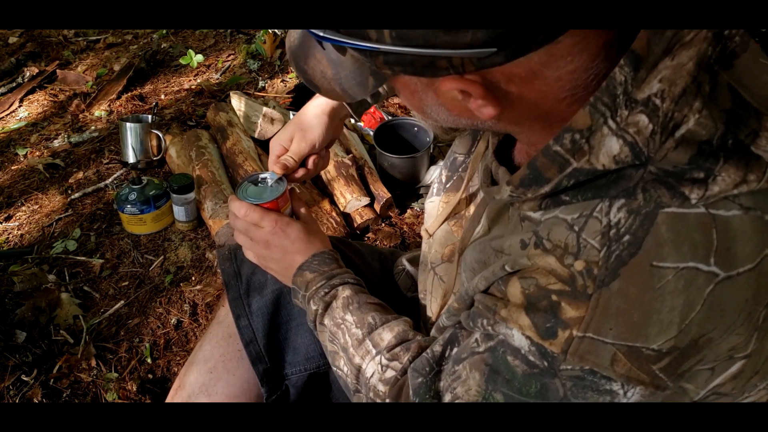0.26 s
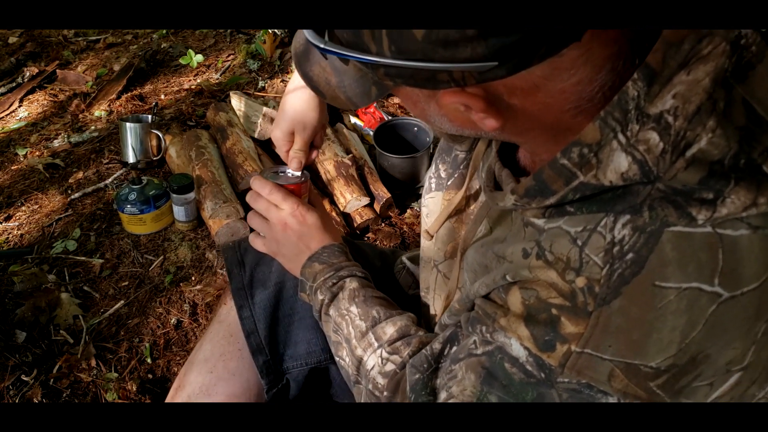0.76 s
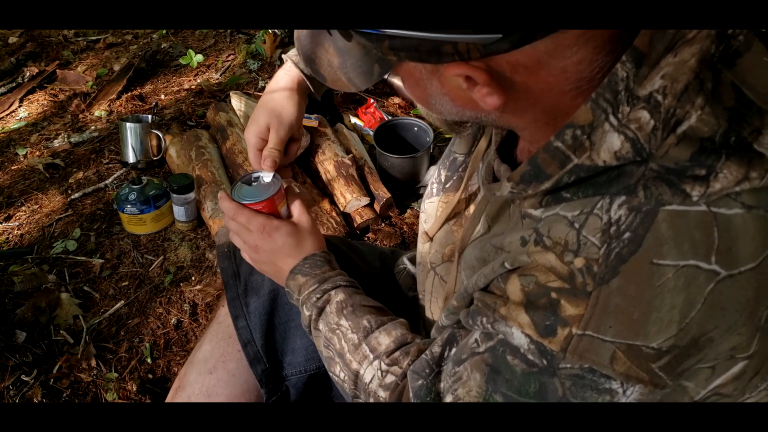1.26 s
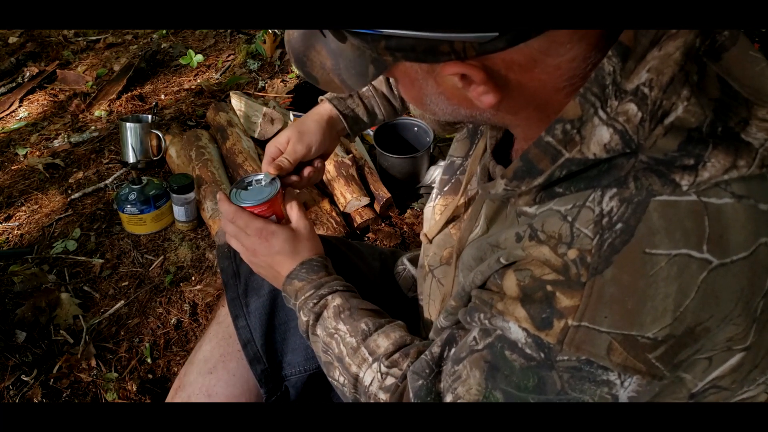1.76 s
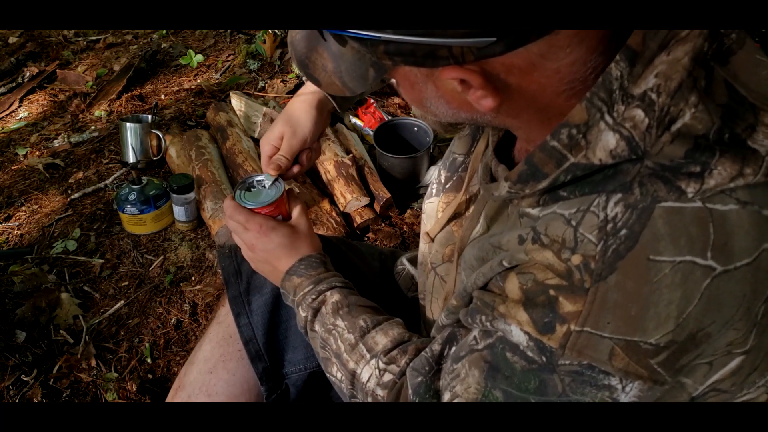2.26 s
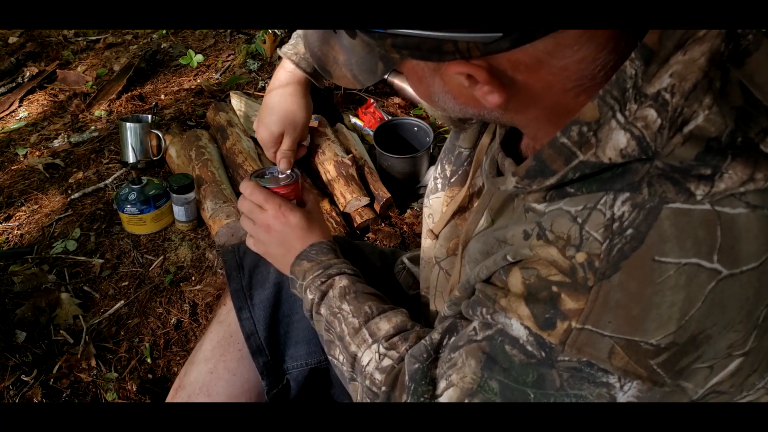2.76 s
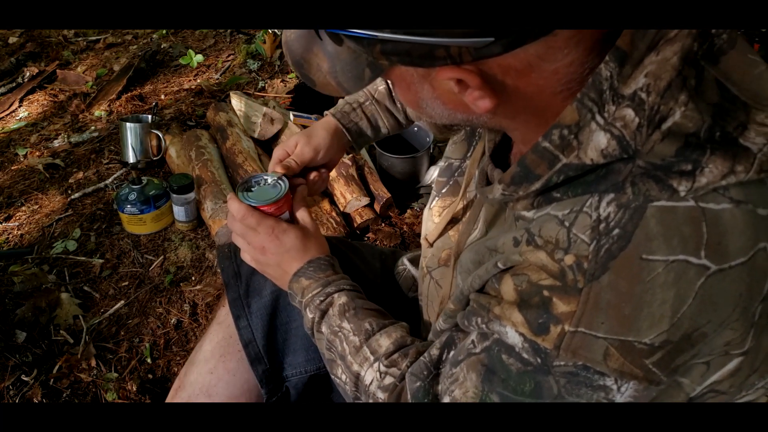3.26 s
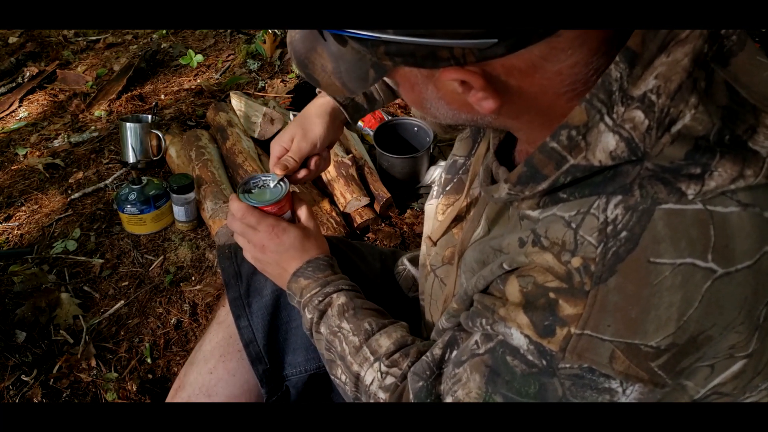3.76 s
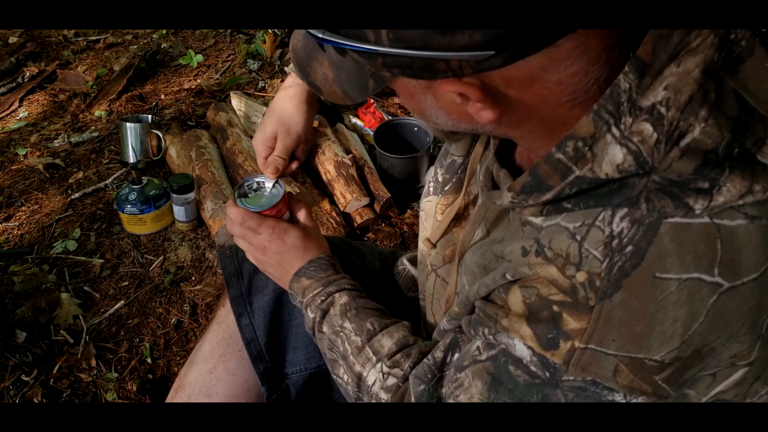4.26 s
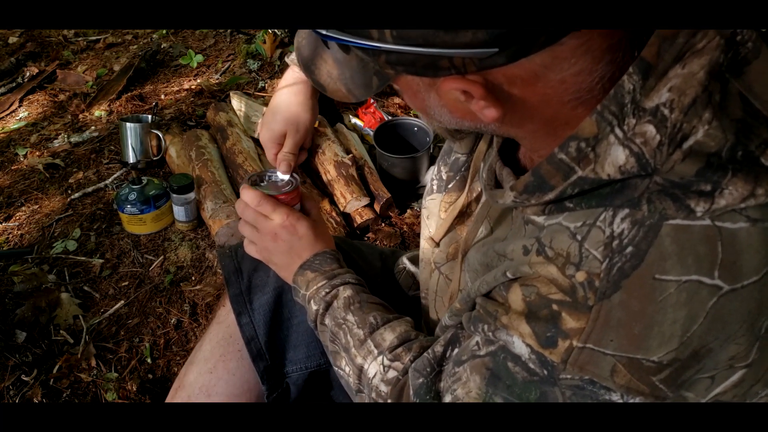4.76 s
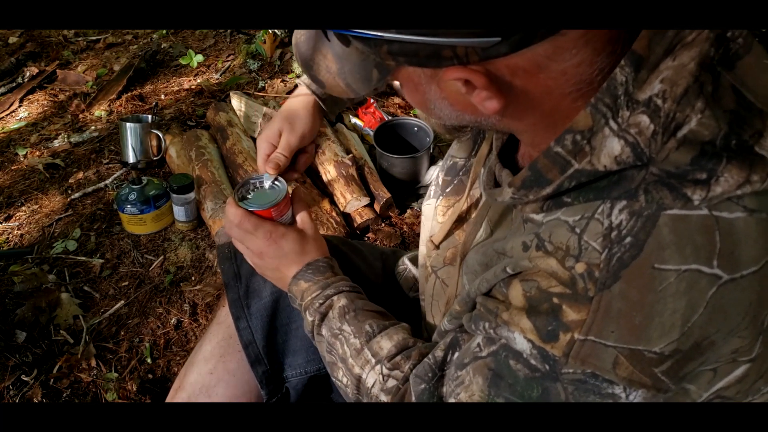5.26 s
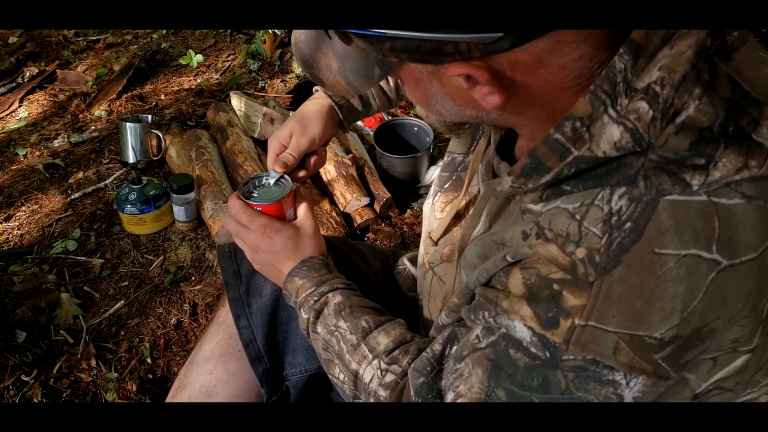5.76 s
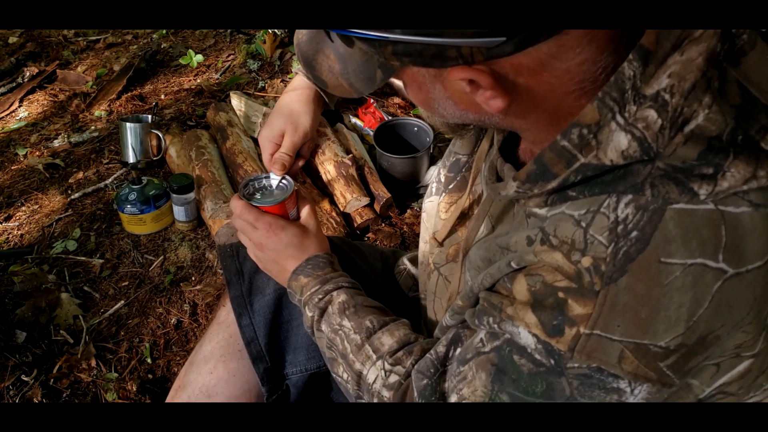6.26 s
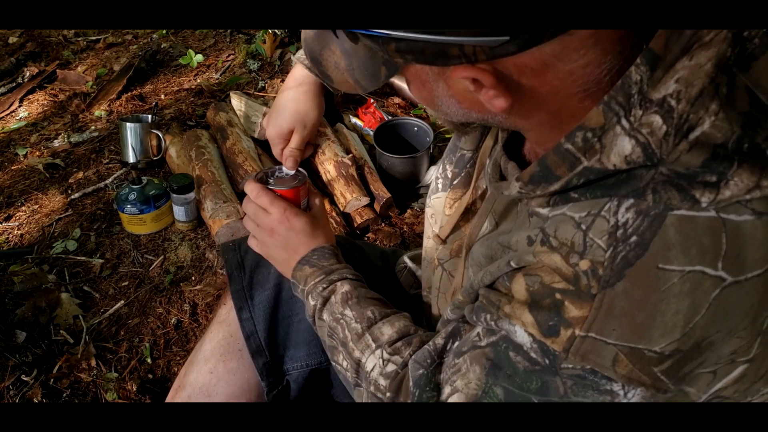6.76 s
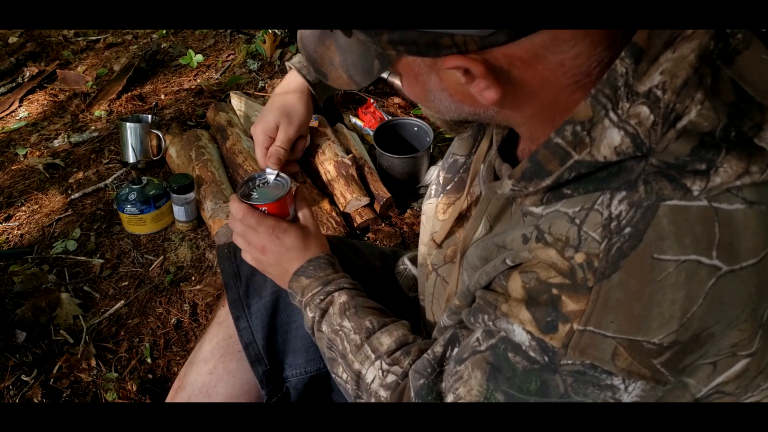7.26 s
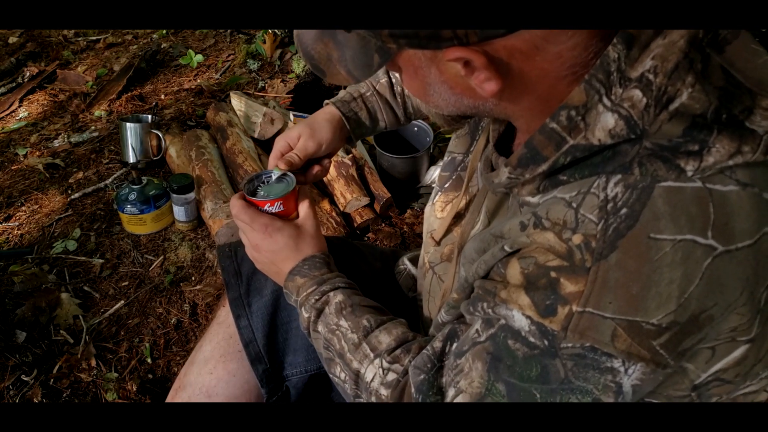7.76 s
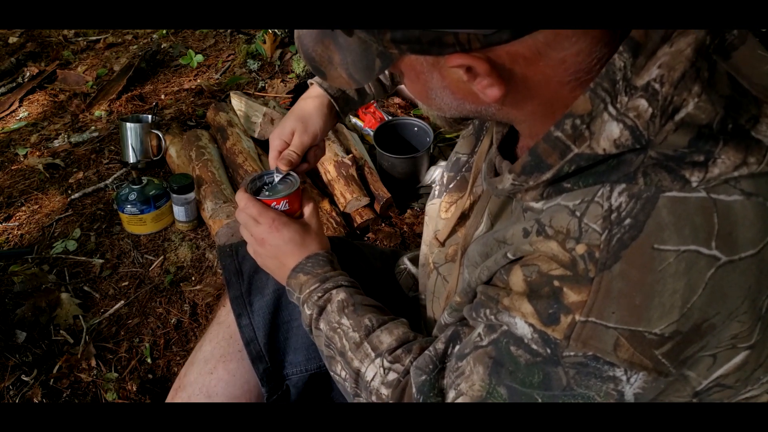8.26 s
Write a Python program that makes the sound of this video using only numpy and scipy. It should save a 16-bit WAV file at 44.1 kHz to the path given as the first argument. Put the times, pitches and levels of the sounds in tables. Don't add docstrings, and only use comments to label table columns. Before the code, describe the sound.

Very close to a small worn microphone outdoors, a lever opener punches through a tin lid in scattered single or double hits. Each gives a sharp, quickly choked metallic pop, with tiny scrapes between. A loose microphone contact ticks, chatters and thumps irregularly as the wearer moves. The space is dry, with short scattered reflections and soft hiss; the loudest hits overload.

```python
import sys
import numpy as np
from scipy import signal
from scipy.fft import rfft, irfft
from scipy.io import wavfile
from scipy.ndimage import uniform_filter1d

SR = 44100
rng = np.random.default_rng(int(sys.argv[2]) if len(sys.argv) > 2 else 0)


def wav_record(signal):
    frames = np.transpose(np.atleast_2d(signal))
    bounded = np.clip(frames, -1, 1)
    quanta = np.round(bounded * 32767).astype(np.int16)
    wavfile.write(sys.argv[1], SR, quanta)


def nominal_scale(level):
    x = np.asarray(level, float) / 20
    return 10 ** x


N = 374850


def evened(x):
    return x / np.sqrt(np.mean(x ** 2) + 1e-20)


def add(mix, start_s, sound):
    part = mix[round(start_s * SR):][:len(sound)]
    part += sound[:len(part)]


def ring(hz, level_db, t60_s, rise_ms, phase):
    t = np.arange(3500)[:, None] / SR
    build = (1 - np.exp(-t / (max(rise_ms, 0.1) * 0.00023))) ** 2
    grip = nominal_scale(-(t / 0.0062) ** 2)
    decay = nominal_scale(level_db - 60 * t / np.clip(t60_s, 0.005, 0.1))
    waves = np.sin(2 * np.pi * (hz * t + phase))
    return (build * grip * decay * waves).sum(axis=1)


# start_s, peak_db, tearing_ms, wall_db (against the lid), treble_db (of the wall)
PUNCHES = [
    (0.6943, -9, 5.2, 1, -30),
    (0.7459, -2.5, 1.88, 0, -14),
    (2.5068, -16.5, 3.4, 0, -17),
    (2.5591, 0.5, 2, -4, -15),
    (3.1537, -11.5, 2.2, -12.5, -12),
    (4.668, -3.5, 2, -2.5, -18),
    (4.821, -1, 0.8, -3, -12),
    (6.6844, -4, 1.7, 0, -13.5),
    (6.7044, 2.5, 1.6, -9.5, -14),
]
# pitch_hz, level_db, t60_s
LID = [
    [(944, -8.5, 0.035), (2330, -12, 0.014), (2990, -3, 0.018)],
    [(430, -12, 0.049), (1120, -4, 0.058), (1420, 1, 0.033), (2100, 5, 0.0066), (3210, 4, 0.013),
     (3620, 5, 0.015), (4160, 0, .015), (5050, -15, 0.022)],
    [(1085, 3, 0.054), (2420, 1.5, 0.014), (3600, -2, .012)],
    [(1156, -10.5, 0.12), (1340, -2, 0.018), (2200, -11, 0.014), (2920, -7.5, 0.02), (3760, 1.5, 0.015),
     (4600, -10, 0.013)],
    [(1340, 0, 0.045), (1460, -5, 0.025), (3215, -1, 0.012)],
    [(1010, -4, 0.06), (1350, 5, 0.046), (1410, 6, 0.032), (3040, 12, 0.0073)],
    [(1420, 5, 0.015), (2160, -14, .016), (2780, -9.5, 0.021), (3240, -13, 0.036), (4260, -9.5, 0.014),
     (5030, -19, 0.013)],
    [(1570, -1, 0.071), (1674, 9, 0.03), (4030, -16, 0.01)],
    [(1594, 12, 0.023), (2570, 9.5, 0.0098), (4240, 3.5, 0.013), (5360, -10, .025)],
]
# lowest_hz, highest_hz, t60_s
WALL = (680, 15500, .017)


def punches():
    out = np.zeros(N)
    low_hz, high_hz, t60_s = WALL
    chance = rng.random((len(PUNCHES), 4, 80))
    for (start_s, db, tear_ms, wall_db, treble_db), lid, (u, v, w, phase) in zip(PUNCHES, LID, chance):
        body = ring(*np.transpose(lid), tear_ms, phase[:len(lid)])
        hz = low_hz + (high_hz - low_hz) * ((np.arange(80) + u) / 80) ** 1.3
        top_hz = 4770 + 93.5 * db
        thinning = np.clip((hz - top_hz) / 1600 + 0.35, 0, 1)
        thinning += 1.7 * np.maximum(hz / top_hz / 2 - 1, 0)
        wall_t60_s = t60_s * (0.49 + 1.94 * w ** 4)
        wall = ring(hz, treble_db * thinning + 6.8 * v, wall_t60_s, 0.63 * tear_ms, phase)
        wall /= abs(wall).max()
        sound = body / abs(body).max() + nominal_scale(wall_db) * wall
        add(out, start_s, nominal_scale(db + wall_db - 15) * wall)
        add(out, start_s + 0.45 * tear_ms / 1000, nominal_scale(db) * sound / abs(sound).max())
    return out


def resonate(x, hz, width_hz):
    b, a = signal.iirpeak(hz, hz / width_hz, SR)
    return signal.lfilter(b, a, signal.lfilter(b, a, x))


# start_s, length_s, level_db, lid_pitch_hz, overtones_db
SCRAPES = [
    (0.773, 0.026, -48, 1080, -11),
    (1.378, 0.05, -40, 1100, -13),
    (2.989, 0.048, -44.5, 1290, -8.5),
    (3.132, 0.034, -52, 1380, -18),
    (4.71, 0.021, -51, 1400, -9),
    (5.193, 0.064, -43.5, 1570, -8.5),
    (5.254, 0.041, -48, 1570, -16),
    (7.248, 0.036, -50, 2000, -20),
    (7.296, 0.042, -44.5, 1960, -16),
]
# pitch_ratio, width_hz, level_db
OVERTONES = [(1.68, 600, -1.0), (2.66, 300, -6.0)]


def scrapes():
    out = np.zeros(N)
    for start_s, length_s, db, hz, over_db in SCRAPES:
        count = round(length_s * SR)
        sizes = nominal_scale(1.3 * rng.exponential(1, count)) * rng.standard_normal(count)
        slips = sizes * (rng.random(count) < 900 / SR)
        slips *= signal.windows.tukey(count, 0.4)
        slips = np.pad(slips, (0, 600))
        lowest = resonate(slips, hz, 320)
        upper = sum(nominal_scale(d) * resonate(slips, ratio * hz, width) for ratio, width, d in OVERTONES)
        add(out, start_s, nominal_scale(db) * evened(lowest + nominal_scale(over_db) * upper))
    return out


# level_db, t60_s
NEARBY = (-14.5, 0.084)


def nearby(x):
    level_db, t60_s = NEARBY
    t = np.arange(6000) / SR
    echoes = rng.choice([-1., 1.], len(t)) * (rng.random(len(t)) < 900 / SR)
    echoes *= (t > 0.004) * nominal_scale(-60 * t / t60_s)
    return x + nominal_scale(level_db) * signal.oaconvolve(x, echoes / np.linalg.norm(echoes))[:N]


# start_s, step_db
SNAPS_UP = [(.891, -7.5), (0.9525, -15), (1.012, -13.5), (1.1359, -6.5), (1.2916, -11), (1.3635, -12),
            (1.5448, -3), (1.5528, -4), (1.586, -8), (1.801, -24), (2.1255, -11.5), (2.7356, -18),
            (2.9737, -11), (3.243, -13.5), (4.5509, -13.5), (4.6238, -13.5), (4.6936, -15), (5.529, -18),
            (5.5685, -11.5), (5.7888, -12), (5.8369, -13), (6.0692, -9), (6.0457, -10), (6.27, -15),
            (6.3027, -10), (6.31, -10), (6.325, -14), (6.348, -9.5), (6.4004, -15), (6.8258, -19.5)]
# start_s, step_db
SNAPS_DOWN = [(.205, -28), (.9207, -12.5), (1.057, -10), (1.1658, -11), (1.552, -5.5), (1.5598, -5),
              (1.5753, -12), (1.547, -6.5), (1.838, -26), (2.0404, -13.5), (2.658, -12.5), (2.864, -19),
              (4.346, -17.5), (5.243, -26.5), (5.508, -23), (5.6073, -21), (5.6702, -29), (5.7369, -21),
              (5.807, -21), (5.9079, -19.5), (5.92, -19), (6.107, -8.5), (6.2734, -11.5), (6.3017, -10.5),
              (6.382, -14.5), (6.395, -16), (6.872, -21), (7.073, -20), (7.366, -19.5), (7.399, -9.5)]
# start_s, step_db, direction (1 up, -1 down), rise_ms
SLIDES = [(0.576, -22, 1, 1.63), (.943, -14, 1, 1.9), (1.029, -16, -1, 2.1), (1.1075, -18, -1, 4.6),
          (1.14, -6, 1, 4.4), (1.5878, -15, 1, 2.5), (1.952, -8, 1, 2.9), (1.9696, -20, -1, 4.6),
          (2.592, -12.5, -1, 1.06), (2.914, -15.5, -1, 1.8), (2.9854, -16, 1, 5.6), (3.9755, -17, -1, 0.83),
          (4.3346, -15, 1, 1.6), (4.356, -13.5, -1, 1.9), (4.5384, -27, 1, 1.8), (4.8077, -30, -1, 8.1),
          (4.8273, -6.5, -1, 2), (4.8357, -8.5, -1, 7.4), (4.913, -10.5, 1, 3.3), (5.0951, -13.5, -1, 1.9),
          (5.4177, -17, 1, 1.2), (5.5562, -6.5, 1, 6.7), (6.045, -11, -1, 4.5), (6.1279, -10.5, 1, 1.6),
          (6.2837, -14, -1, 4.1), (6.317, -18, 1, 1.9), (6.3365, -14, -1, 2.9), (6.427, -11.5, 1, 2.1),
          (6.509, -26, -1, 2.5), (6.779, -16, -1, 1.5)]


def jumps():
    slope = np.zeros(N)
    snap_ms = 0.2
    rows = [(*row, 1, snap_ms) for row in SNAPS_UP]
    rows += [(*row, -1, snap_ms) for row in SNAPS_DOWN]
    rows += SLIDES
    for start_s, db, way, rise_ms in rows:
        count = int(np.clip(rise_ms * SR / 1000, 2, 399))
        grit = nominal_scale(8 * rng.exponential(1, count))
        add(slope, start_s, np.sign(way) * nominal_scale(db) * grit / grit.sum())
    return slope


# start_s, length_ms, treble_db
RATTLES = [(0.8848, 5.2, -34), (0.9004, 3.4, -34), (1.0282, 3.2, -34.5), (1.1244, 4.3, -29.5),
           (1.1391, 10.8, -35), (1.161, 4.9, -34.5), (1.5463, 18.3, -28), (1.5779, 6.1, -27),
           (2.0649, 3.5, -37), (2.8594, 4.7, -41), (2.9225, 3.7, -38), (3.2424, 2.7, -38),
           (3.2949, 6.5, -39), (3.3865, 5.6, -41.5), (4.3452, 7.8, -45.5), (4.3641, 5.6, -42),
           (4.4722, 2.8, -39), (4.9095, 8.2, -41), (5.0936, 3., -39.5), (5.4165, 7.1, -43),
           (5.5476, 5., -37.5), (6.0455, 3.8, -32.5), (6.1285, 6.2, -33), (6.2885, 4.8, -25.5),
           (6.382, 12.5, -35), (6.4863, 16.8, -40.5), (6.7806, 2.5, -38), (6.8106, 18, -45.5),
           (6.952, 9.1, -47.5), (7.0704, 9.9, -41.5)]


def chatter():
    slope = np.zeros(N)
    for start_s, length_ms, db in RATTLES:
        gap = 2.5 * nominal_scale(27 * rng.random(160))
        gap = np.minimum(gap, length_ms * SR / 3000)
        depth = np.repeat(nominal_scale(7 * rng.random(80)), 2)
        at = np.cumsum(gap) - gap[0]
        pairs = (at < length_ms * SR / 1000).sum() // 2
        at = at[:max(2, pairs * 2)]
        away_and_back = rng.choice([-1., 1.]) * (-1.) ** np.arange(len(at))
        flips = nominal_scale(db + 9.5) * depth[:len(at)] * away_and_back
        np.add.at(slope, np.minimum(round(start_s * SR) + at.astype(int), N - 1), flips)
    return slope


# start_s, treble_db
TICKS = [(0.3628, -28.5), (1.0486, -30), (1.189, -36), (1.2234, -31.5), (1.2367, -31), (1.2917, -24.5),
         (1.5703, -24), (1.5949, -27), (1.952, -35), (2.6581, -59), (2.9073, -39), (2.9733, -34),
         (3.2895, -41), (4.5229, -33), (4.551, -39), (4.624, -27.5), (4.9574, -42.5), (5.5266, -39),
         (5.5704, -32.5), (5.79, -24), (5.8062, -36), (5.8317, -26), (5.8461, -26.5), (5.9047, -31.5),
         (6.124, -31), (6.2637, -35), (6.3396, -25.5), (6.6673, -35), (7.182, -33), (7.3989, -33.5)]


def ticks():
    slope = np.zeros(N)
    for start_s, db in TICKS:
        width_ms = 0.11 * (0.7 + 0.8 * rng.random())
        width = round(width_ms * SR / 1000)
        way = np.sign(rng.random() - 0.3)
        add(slope, start_s, way * nominal_scale(db + 14) * np.r_[1, np.zeros(width - 1), -1])
    return slope


# start_s, length_s, crackle_db, small_jumps_db
BOUTS = [(0.111, .22, -53.5, -36.5), (0.582, 0.066, -62.5, -37), (0.865, 0.057, -49, -37),
         (0.973, 0.2, -45, -29.5), (1.228, 0.15, -45.5, -29), (1.44, 0.047, -49, -37),
         (1.536, 0.061, -44, -23.5), (1.797, 0.026, -58, -50), (1.958, 0.09, -55.5, -38),
         (2.148, 0.21, -54, -38), (2.435, 0.22, -55.5, -42.5), (2.863, 0.02, -47, -29),
         (2.98, 0.21, -56.5, -34.5), (3.223, 0.14, -51, -33), (3.75, 0.16, -56, -33),
         (3.966, 0.71, -58, -40), (4.332, 0.12, -53.5, -39), (4.526, 0.085, -43.5, -31.5),
         (4.782, 0.13, -49.5, -29.5), (4.957, .13, -55, -36.5), (5.24, 0.038, -54.5, -49),
         (5.422, 0.26, -49, -33), (5.762, 0.18, -52, -57), (6.054, 0.085, -52.5, -47),
         (6.253, 0.27, -44.5, -30.5), (6.615, 0.07, -47, -35), (6.864, 0.1, -50.5, -41.5),
         (7.076, 0.1, -52.5, -40.5), (7.24, .12, -52, -46), (7.397, 0.12, -56.5, -37)]
# time_s, crackle_db
REST = [(0, -62), (3.45, -59), (3.7, -63), (4.3, -60), (7.5, -60), (7.8, -66), (8.0, -64), (8.2, -70),
        (8.5, -68)]


def movement(t):
    rest_db = np.interp(t, *np.transpose(REST))
    power = nominal_scale([rest_db, rest_db + 13]) ** 2
    for start_s, length_s, *db in BOUTS:
        stir = np.clip((t - start_s) / 0.014 + 1, 0, 1)
        settle = nominal_scale(-256 * np.maximum(t - start_s - length_s, 0))
        power += (nominal_scale(db)[:, None] * stir * settle) ** 2
    return np.sqrt(power)


def drift(hz):
    return evened(signal.sosfilt(signal.butter(2, hz, fs=SR, output="sos"), rng.standard_normal(N)))


def rubbing():
    gains = movement(np.arange(0, N, 50) / SR)
    crackle, jump = np.repeat(gains, 50, axis=1)[:, :N]
    way = rng.choice([-1., 1.], N)
    clumps = nominal_scale(3.3 * np.clip(drift(80), -2, 2.5))
    uneven = np.minimum(rng.exponential(1, (2, N)), 3.5)

    size = way * nominal_scale(4.5 * uneven[0]) * clumps
    size *= rng.random(N) < 2800 / SR
    size = evened(size) * crackle * nominal_scale(-2)
    delay = (2 * nominal_scale(28 * rng.random(N))).astype(int)
    flips = size - np.bincount(np.arange(N) + delay, size, N + 1)[:N]

    steps = way * nominal_scale(5.1 * uneven[1]) * clumps
    steps *= rng.random(N) < 300 / SR
    steps = evened(uniform_filter1d(steps, size=9)) * jump * nominal_scale(-30.5)
    return flips + steps


# pitch_hz, level_db (per Hz)
AIR = [(18, -36), (30, -16.5), (115, 10.5), (600, -13), (844, -9), (9460, -21.5), (14000, -23.5),
       (16000, -29)]


def air():
    hz, db = np.transpose(AIR)
    f = np.fft.rfftfreq(N, 1 / SR)
    colour = nominal_scale(np.interp(np.log(f + 1), np.log(hz + 1), db))
    hiss = irfft(rfft(rng.standard_normal(N)) * colour, N)
    return nominal_scale(-54 + 0.5 * drift(24)) * evened(hiss)


def scene():
    can = nearby(punches() + scrapes())
    contact = np.cumsum(jumps() + chatter() + ticks() + rubbing())
    contact = signal.sosfilt(signal.butter(1, 16000, fs=SR, output="sos"), contact)
    return (can + contact + air())[None]


def top_cut(x):
    return signal.sosfilt(signal.butter(12, 15790, fs=SR, output="sos"), x)


def record(dry):
    cut = signal.sosfilt(signal.butter(5, 47, "high", fs=SR, output="sos"), dry)
    cut = np.clip(cut, -0.93, 0.93)
    cut = signal.oaconvolve(cut, signal.firwin(301, 16300, fs=SR)[None], "same")
    return top_cut(cut)


dry = scene()
out = record(dry)
wav_record(out)
```